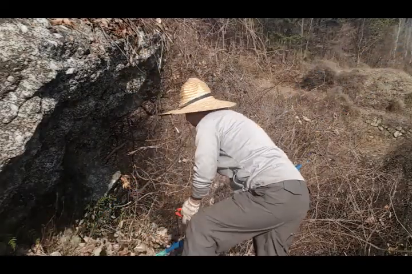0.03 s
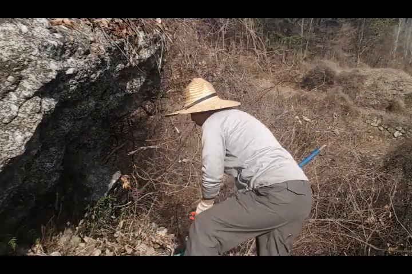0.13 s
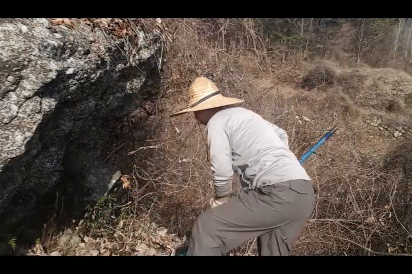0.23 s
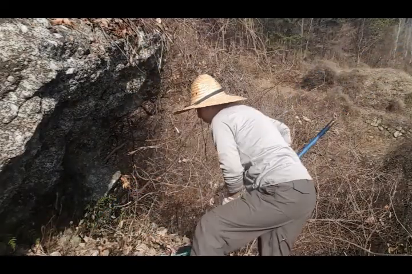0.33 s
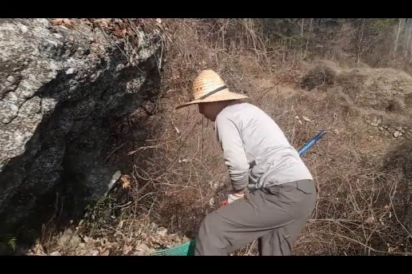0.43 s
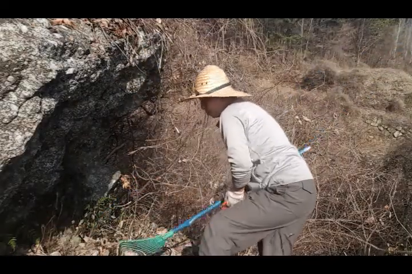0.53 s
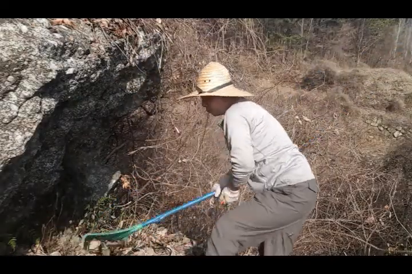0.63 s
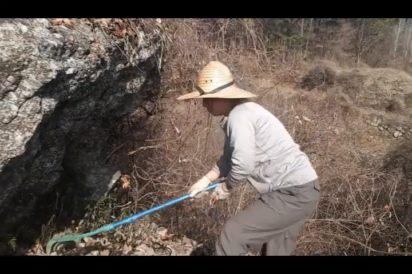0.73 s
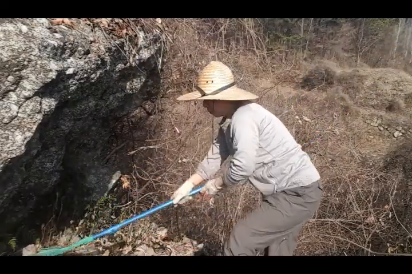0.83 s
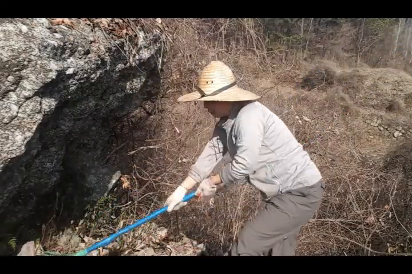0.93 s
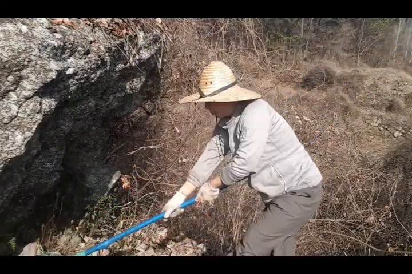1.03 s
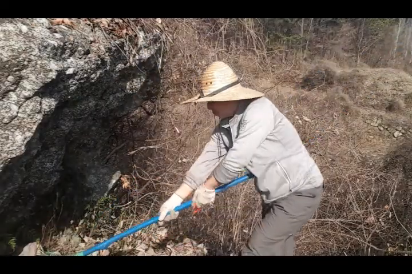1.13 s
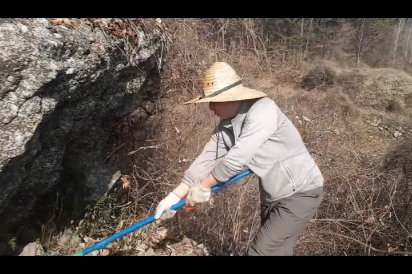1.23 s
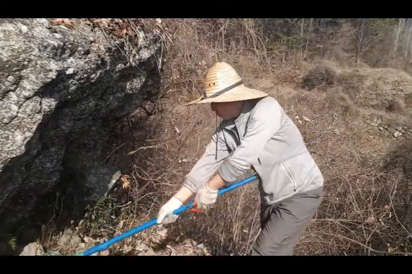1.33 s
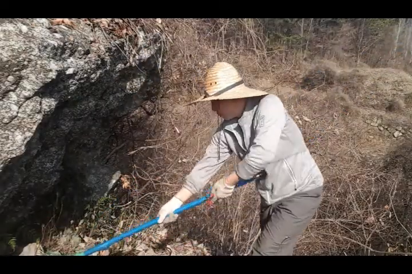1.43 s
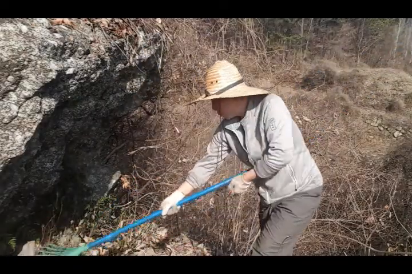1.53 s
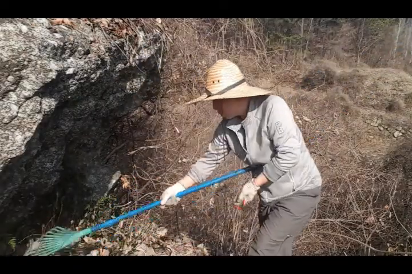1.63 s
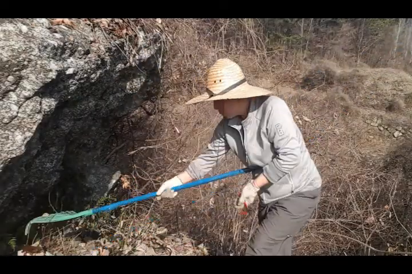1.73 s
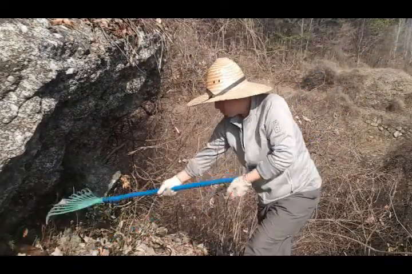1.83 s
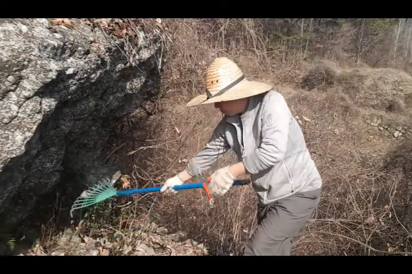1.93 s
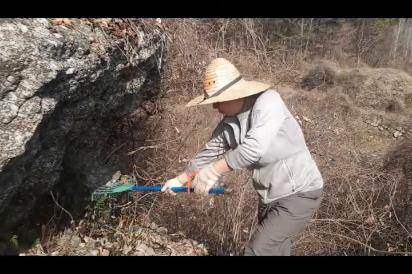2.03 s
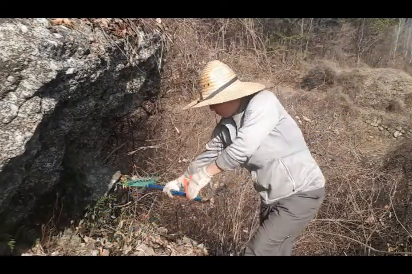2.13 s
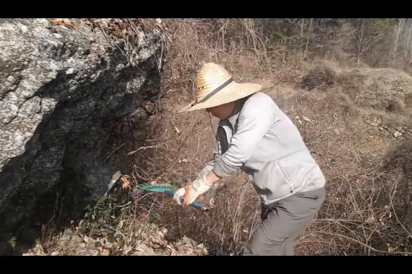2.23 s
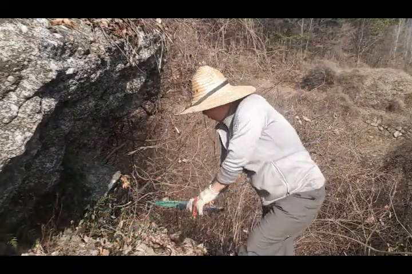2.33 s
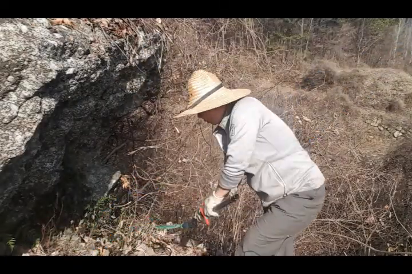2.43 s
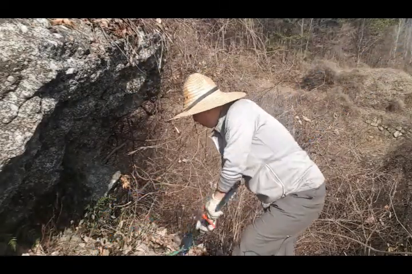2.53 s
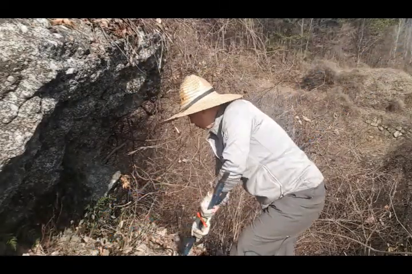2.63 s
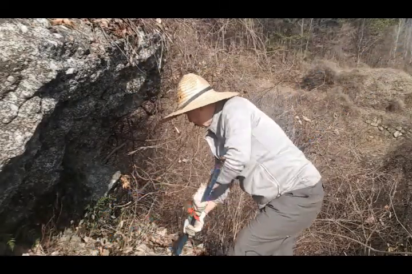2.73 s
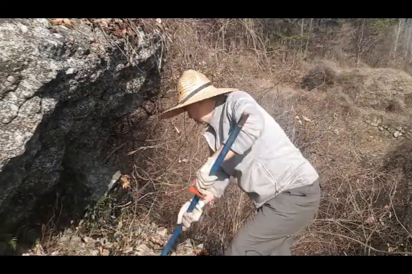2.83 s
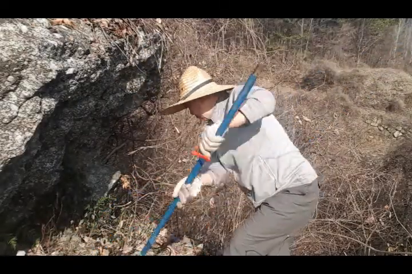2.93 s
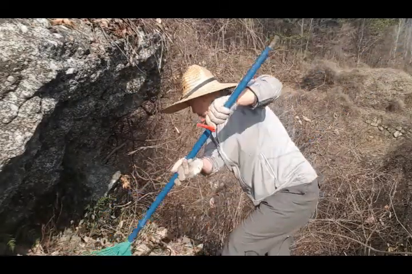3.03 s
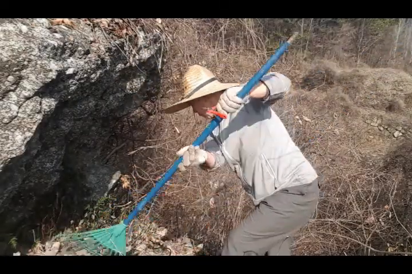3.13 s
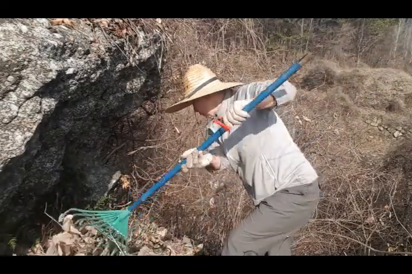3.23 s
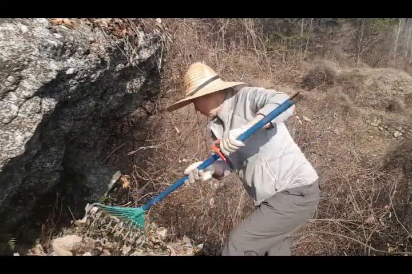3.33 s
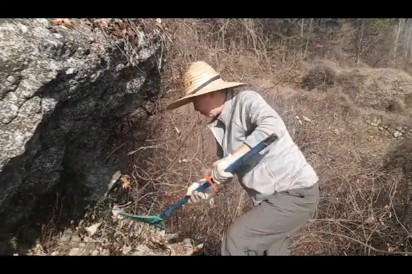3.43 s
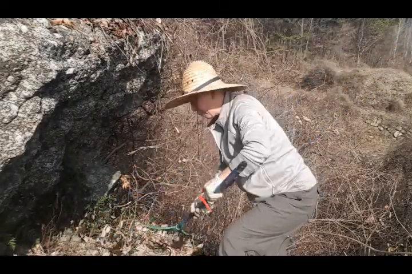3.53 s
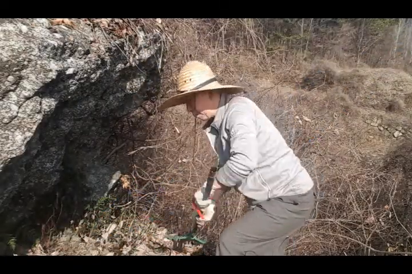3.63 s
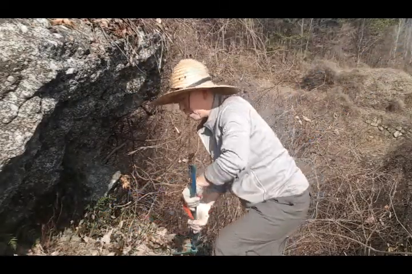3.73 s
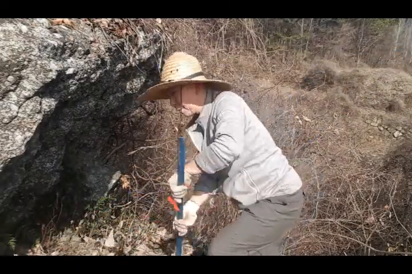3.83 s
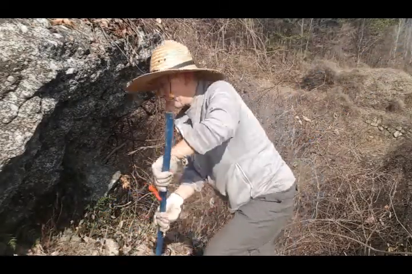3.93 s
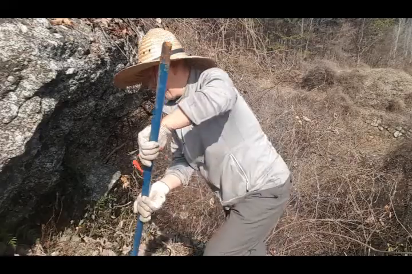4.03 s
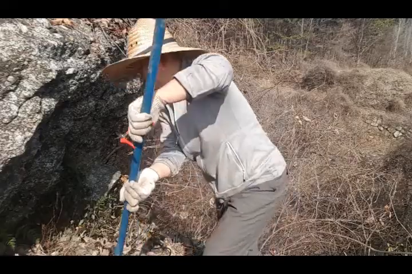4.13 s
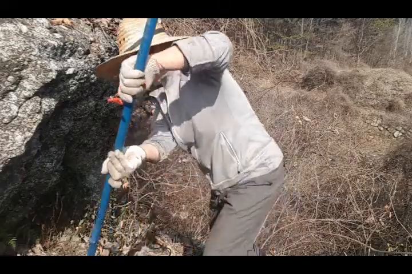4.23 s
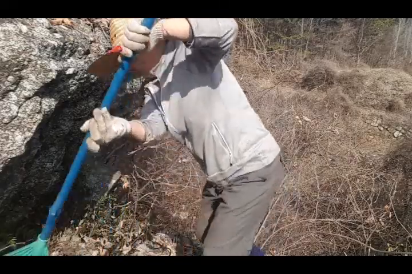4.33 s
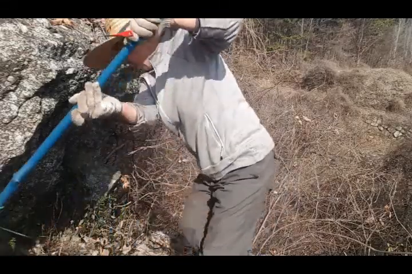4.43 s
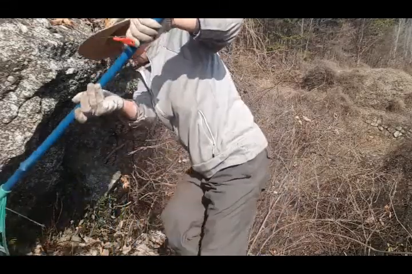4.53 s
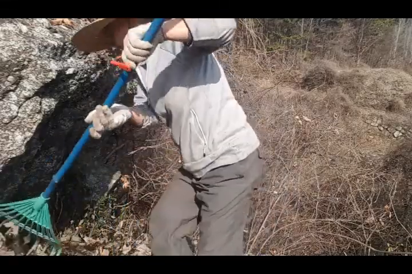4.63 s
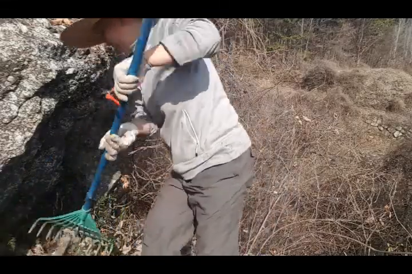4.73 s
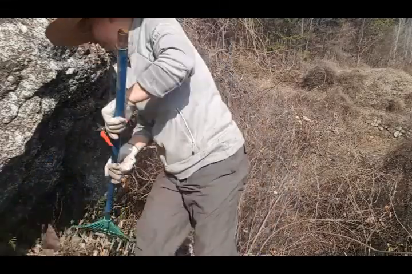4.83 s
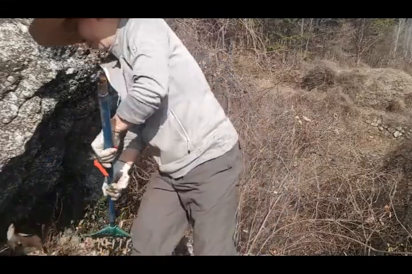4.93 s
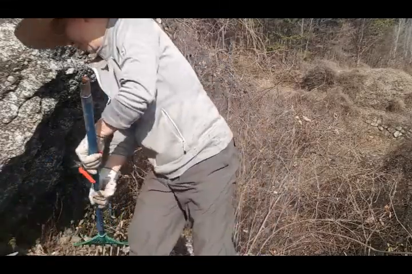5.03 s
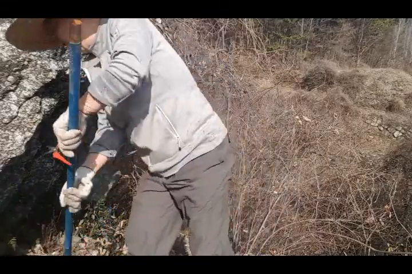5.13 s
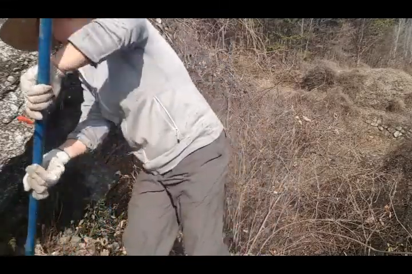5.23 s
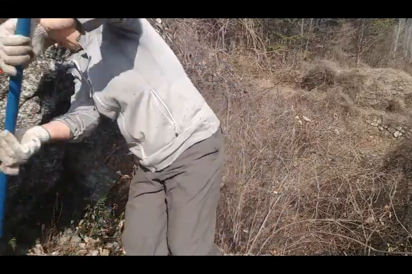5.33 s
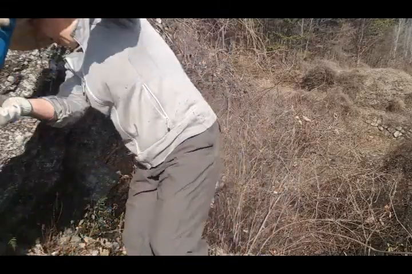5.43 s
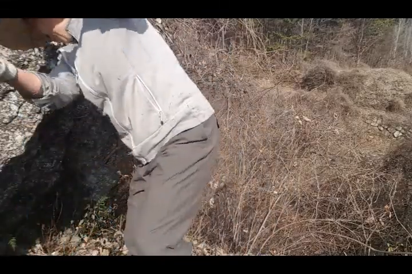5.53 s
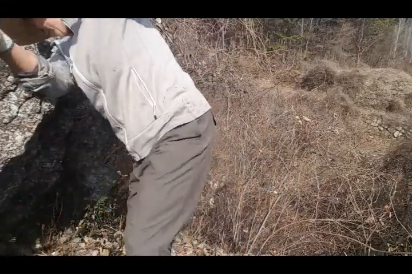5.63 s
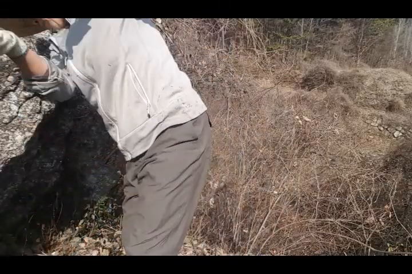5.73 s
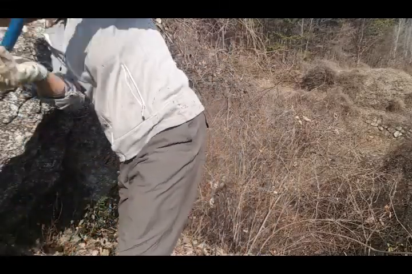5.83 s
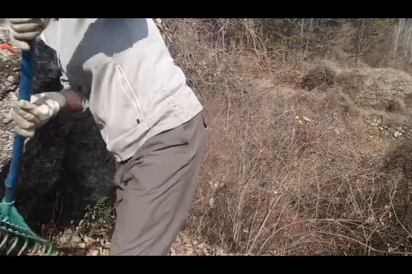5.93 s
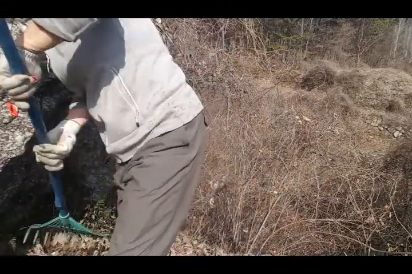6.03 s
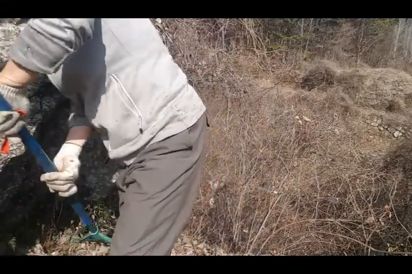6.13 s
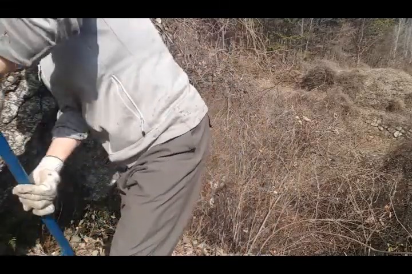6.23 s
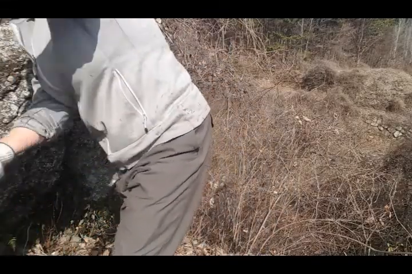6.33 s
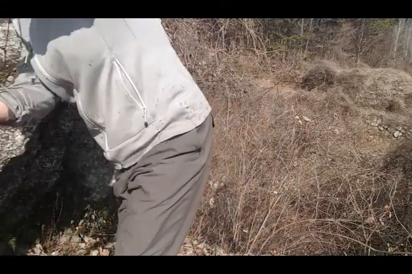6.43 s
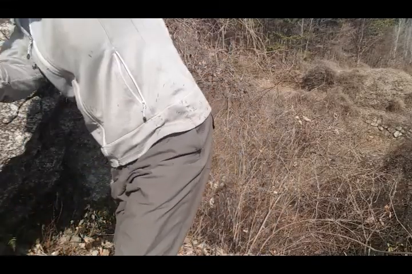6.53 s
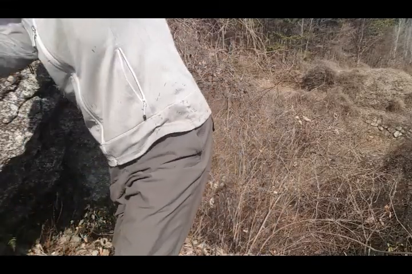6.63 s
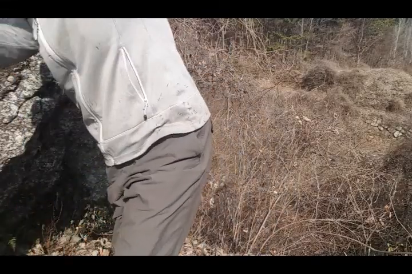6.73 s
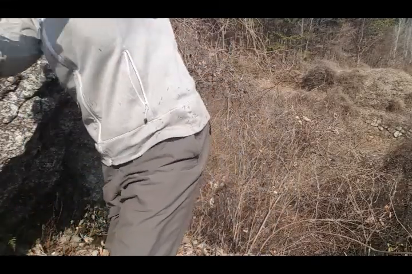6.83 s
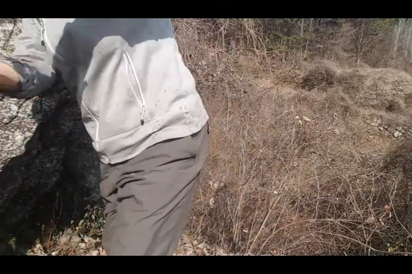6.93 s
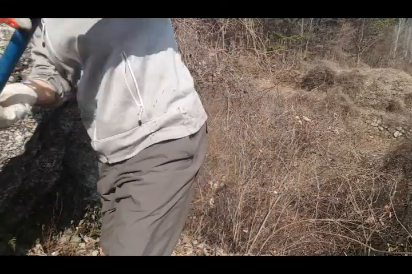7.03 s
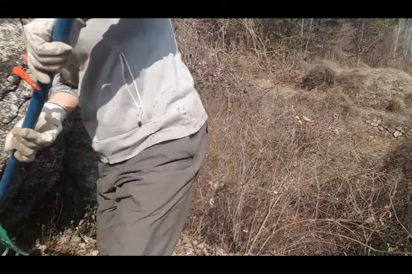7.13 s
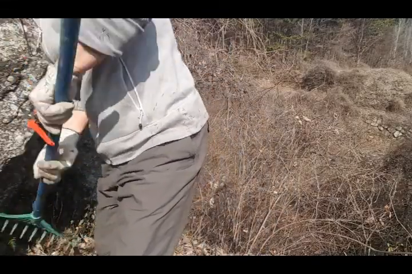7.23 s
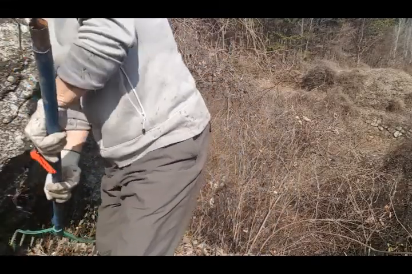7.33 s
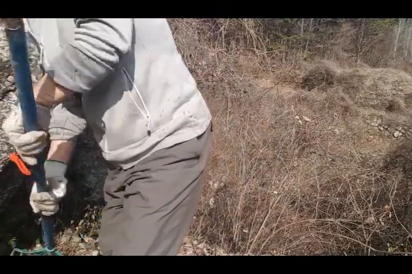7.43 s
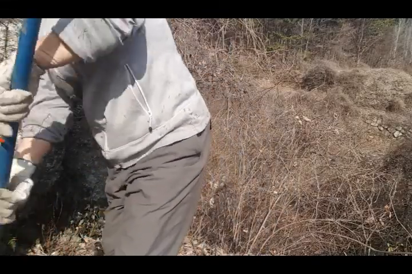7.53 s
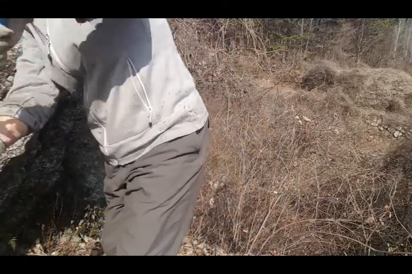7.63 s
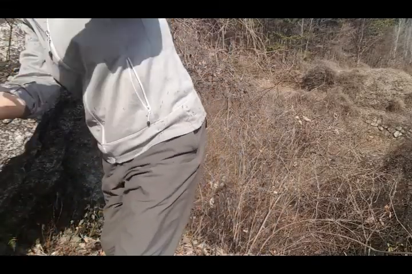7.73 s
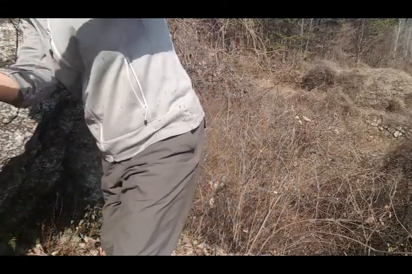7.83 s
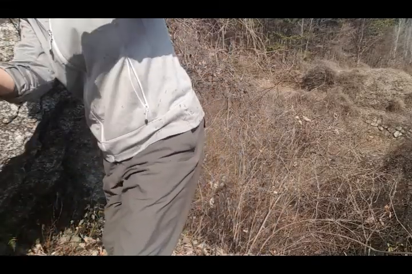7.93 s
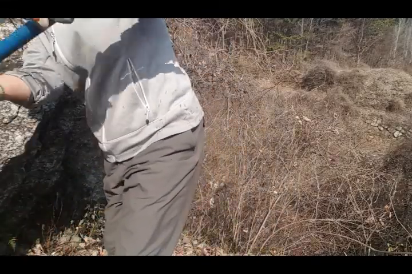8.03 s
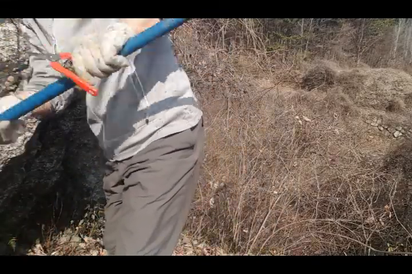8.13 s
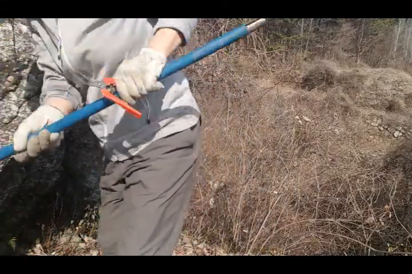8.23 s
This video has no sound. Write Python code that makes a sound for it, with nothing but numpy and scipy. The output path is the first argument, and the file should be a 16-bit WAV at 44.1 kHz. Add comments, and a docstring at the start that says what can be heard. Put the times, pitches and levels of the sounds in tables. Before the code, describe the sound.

A plastic rake scrapes through dry leaves and dead brambles on a quiet hillside. It starts with light, short scratches, then moves into longer, louder pulls that crackle and drag the heap over the soil. Twigs snap and the rake head knocks on the ground now and then. The work is close to the microphone and drifts to the right, over a faint open-air hush.

```python
"""A quiet slope, beside a rock: a plastic rake is pulled unevenly through dry leaves and dead brambles.
Leaves crumple in tiny bursts, stems rasp and ring the tines, and the heap drags over the soil.
Twigs snap and the rake head knocks. The work is close by and drifts to the right of a two-port
stereo microphone; ground and rock scatter the sound briefly, over a faint open-air hush."""
import sys
import numpy as np
from scipy import signal
from scipy.fft import rfft, irfft
from scipy.io import wavfile
from scipy.ndimage import uniform_filter1d

SR = 44100
rng = np.random.default_rng(int(sys.argv[2]) if len(sys.argv) > 2 else 0)


def persist_wave(psi):
    """Save psi, clipped to +-1, as 16-bit WAV."""
    counts = np.round(np.clip(psi, -1, 1) * 32767).astype(np.int16)
    wavfile.write(sys.argv[1], SR, np.atleast_2d(counts).T)


N = 365588

# Spectra of open air, twigs, dragged heap, stems and leaves. Each row: frequency in Hz, gain in dB.
AIR_SPECTRUM = [(20, -30), (50, -11), (170, -11), (700, -17.5), (2200, -21), (9400, -62), (14000, -57)]
TWIG_SPECTRUM = [(100, -8), (500, -21), (1300, 2), (2000, 3.5), (3500, 2), (6000, -5), (9600, -10.5),
                 (14000, -7)]
HEAP_SPECTRUM = [(25, -29), (50, -44), (75, -8), (140, 1.5), (300, 0.5), (480, 1), (650, 1.5), (820, 1),
                 (1050, -4.5), (1600, -3), (3500, -22.5)]
STEM_SPECTRUM = [(600, -22), (1100, -0.5), (1500, -3), (2000, -0.5), (2600, -3), (3300, -1), (4300, -5.5),
                 (7000, -17)]
LEAF_SPECTRUM = [(1500, -24), (3000, -14.5), (4300, -1), (6000, -1.5), (8200, -1), (9600, -5.5),
                 (11500, -1.5), (14500, -2)]
# Rake head and boots meeting the ground. Each row: start in seconds, peak in dB, pitch in Hz.
GROUND_KNOCKS = [(1.125, -41, 150), (1.267, -57, 500), (1.289, -49, 129), (1.915, -47, 587),
                 (2.695, -46, 400), (2.743, -38, 685), (2.898, -32.5, 490), (2.908, -36, 490),
                 (3.069, -39, 104), (4.101, -30.5, 517), (4.2, -28, 666), (4.872, -26.5, 480),
                 (4.876, -35, 200), (4.887, -32, 92), (5.33, -42, 303), (5.412, -37.5, 90),
                 (6.097, -32, 228), (6.483, -31.5, 345), (7.742, -28.5, 254)]
# Modes of the plastic head. Each row: frequency in Hz, relative level in dB, t60 in seconds.
PLASTIC_MODES = [(434, 5, 0.07), (636, 11, 0.07), (1080, -14, .04), (1600, 12, 0.043), (2000, -23, .04),
                 (2700, 13.5, 0.026)]
# Twigs breaking. Each row: start in seconds, level of the first 5 ms in dB, treble lift in dB,
# t60 of the splintering in seconds (negative for a clean break).
TWIG_SNAPS = [(0.984, -45, 9, 1), (1.058, -40.5, 6, -0.1), (1.102, -36, 12, -1), (1.325, -59.5, -3, 7),
              (1.493, -54, 17, -3.5), (1.638, -50, 7, 0.3), (1.921, -46, 3.5, 0.3), (2.028, -56.5, 3, 1),
              (2.101, -53.5, 14, 0.7), (2.374, -67, 8, -0.1), (2.561, -54, -6, 0.15),
              (2.692, -46.5, 8, -0.75), (2.747, -38, -1, -0.34), (2.872, -46.5, 2, -0.5),
              (2.912, -43, -14, -1.06), (4.233, -37, -9, 0.2), (4.2806, -25.5, 5.5, -0.33),
              (4.285, -32, 2, -0.3), (5.3411, -27.5, -0.5, -0.66), (5.349, -27.5, -8, -0.56),
              (5.832, -35, 5, -0.46), (6.152, -39, -7, -0.24), (6.263, -46, -8, 0.3),
              (6.441, -39.5, -1, -1.5), (6.464, -34.5, 12, -1), (6.561, -34, 18, 0.2),
              (6.7185, -26, 9, -0.4), (6.764, -43, 16, 1.8), (7.262, -39, 3, -1.9), (7.499, -49.5, 9, 1.2)]
# Resonances of the springy tines and hollow head. Each row: centre in Hz, width in Hz, gain in dB.
TINE_RESONANCES = [(842, 140, 5), (2630, 620, 7), (3100, 520, 0.5)]
# Pulls of the rake. Each row: start, swell and length in seconds, full force in dB, then offsets in dB
# for first bite, leaves, heap and tines, then the spill's length in seconds and its offset in dB.
RAKE_PULLS = [(-0.036, .147, 0.27, -40.5, -10, 3, -6, -12.5, 0.16, -6),
              (1.03, .07, 0.073, -46.5, -5, 3.5, -3.9, -14, .27, -17),
              (2.847, .19, 0.39, -41, -18, 3.8, 1, -8, 0.37, -12.5),
              (4.03, 0.28, .57, -40, -14.5, 2, 1, -8.5, 0.28, -6.4),
              (5.292, 0.32, 0.47, -34, -12.5, .1, -0.5, -11.5, .45, -13.5),
              (6.448, 0.27, 0.4, -37, -4.5, 3.8, 0.1, -5.5, 0.4, -6.5),
              (7.694, 0.065, 0.38, -38.5, -9, 2.2, -1, -4.5, 0.15, -10)]
# Short scrapes over the litter. Each row: start and length in seconds, force in dB, leaf offset in dB.
SHORT_SCRAPES = [(0.427, 0.015, -45, -13), (0.611, 0.22, -55.5, 1.5), (0.873, 0.13, -54.5, 3),
                 (1.237, 0.026, -53.5, -1), (1.676, .1, -57, 4), (1.787, .12, -55.5, 5.5),
                 (2.023, 0.12, -69, 5), (2.678, 0.017, -62, 8), (2.72, 0.019, -47, 2.5),
                 (2.79, 0.13, -58, -8), (3.633, 0.09, -52.5, -1.5), (4.036, .025, -50.5, -6),
                 (4.178, 0.038, -39, -1), (5.098, 0.024, -56, 8), (5.332, 0.018, -36.5, 0.5),
                 (7.584, 0.11, -61.5, 5), (7.738, 0.047, -37, 2)]
# The litter never lies quite still. In order: resting drive of leaves, stems, heap and tines in dB.
RESTING_STIR_DB = [-71.5, -69.5, -72, -78]
# The rake as seen from the microphone. Each row: time in seconds, angle to the right in degrees.
RAKE_BEARING = [(0, 9.2), (1.2, 29.3), (2.1, 25), (3.0, 16.4), (4.3, 15.7), (4.8, 41), (5.3, 29), (6.1, 54),
                (6.6, 44.5), (8.2, 50)]

AIR_DB, TOP_HZ = -65.5, 14600
PORT_LAG_MS = 0.46  # delay at the left port for a sound from the far right
CRACK_T60_S, FIBRES_PER_S = 0.015, 4500  # a twig's first break; fibres parting after it
CATCH_S, RELEASE_DB_PER_S = 0.033, 106  # the tines sink in; the rake comes to rest
SAG_DB_PER_S, HEAP_SAG_DB_PER_S = 3, 11.5  # the pull eases; the heap thins out faster still
SPILL_ATTACK_S, SETTLE_DB_PER_S = 0.12, 47  # leaves fall from the lifted rake and settle
SPILL_LEAF_DB, SPILL_HEAP_DB, SPILL_TINE_DB = 1.6, -4, -8.5
SCRAPE_ATTACK_S, SCRAPE_RELEASE_DB_PER_S, SCRAPE_HEAP_DB, SCRAPE_TINE_DB = 0.029, 221, -4, -9
STRAY_PER_S, STRAY_DB, STRAY_FOLLOW = 45, -31, 0.67  # lone ticks gain 0.67 dB per dB of leaf crackle


def undb(db):
    """Decibels to gain."""
    return 10 ** (np.asarray(db) / 20)


def unit(x):
    """Scale a stereo sound so that its centre has rms 1."""
    return x / np.sqrt(np.mean(x.mean(axis=0) ** 2))


def colour(x, points, size=4096):
    """Minimum-phase filter through the given (Hz, dB) points."""
    hz, db = np.transpose(points)
    bins_hz = np.maximum(np.fft.rfftfreq(size, 1 / SR), 1)
    cepstrum = irfft(np.log(undb(np.interp(np.log(bins_hz), np.log(hz), db))))
    cepstrum[1:size // 2] *= 2
    cepstrum[size // 2 + 1:] = 0
    impulse = irfft(np.exp(rfft(cepstrum)))
    return signal.fftconvolve(x, impulse[None], axes=1)[:, :x.shape[1]]


def resonate(x, modes):
    """A sum of resonances, each given as (Hz, width in Hz, dB)."""
    return sum(undb(db) * signal.lfilter(*signal.iirpeak(hz, hz / width, fs=SR), x)
               for hz, width, db in modes)


def walk(rate):
    """A smooth random wander of spread 1, with `rate` new values a second."""
    hold = max(int(SR / rate), 1)
    steps = np.repeat(rng.standard_normal(N // hold + 1), hold)
    wander = uniform_filter1d(uniform_filter1d(steps, hold), hold)[:N]
    return wander / wander.std()


def fade(t60, size):
    """Exponential decay, 60 dB down after t60 seconds."""
    return np.exp(-np.log(1000) * np.arange(size) / SR / max(t60, 1e-4))


def linger(power, t60):
    """Let each bit of energy die away exponentially."""
    keep = fade(t60, size=2)[1] ** 2
    return signal.lfilter([1 - keep], [1, -keep], power)


def gate(t, attack, length, release_db_per_s):
    """Gain that rises over the attack, holds to the given length and then dies away."""
    return np.clip(t / attack, 0, 1) * undb(-release_db_per_s * np.maximum(t - length, 0))


def add(out, sound, at):
    """Mix a short stereo sound in, starting at a sample."""
    part = out[:, at:at + sound.shape[1]]
    part += sound[:, :part.shape[1]]


def pan(db):
    """Gains that put the left port `db` above the right."""
    gains = undb(np.array([db, -db]) / 2).reshape(2, -1)
    return gains / np.sqrt(np.mean(gains ** 2, axis=0))


def ports(sound, lag_ms):
    """The sound reaches the microphone's right port first and the left one a little later."""
    index = np.arange(len(sound))
    late = np.rint(lag_ms * SR / 1000).astype(int)
    return np.array([sound[np.clip(index - late, 0, len(sound) - 1)], sound])


def crunch(power, lag_ms, echo_db, echo_t60):
    """Noise that follows an energy curve; ground and rock throw a different short spray at each port."""
    direct = ports(np.sqrt(power) * rng.standard_normal(len(power)), lag_ms)
    echoes = np.sqrt(linger(power + 1e-18, echo_t60)) * rng.standard_normal((2, len(power)))
    return direct + undb(echo_db) * echoes


def air():
    """Faint, gently swelling open-air hush, mostly shared by both ports."""
    noise = rng.standard_normal(N) + 0.78 * rng.standard_normal((2, N))
    swell_db = 1.8 * walk(rate=3.7)
    return unit(colour(noise, AIR_SPECTRUM)) * undb(AIR_DB + swell_db)


def knocks(size=8000):
    """A blow thumps the soil and rings the plastic head; loose earth shifts after it."""
    out, t = np.zeros((2, N)), np.arange(size) / SR
    head = sum(undb(db) * np.sin(2 * np.pi * hz * t) * fade(t60, size) for hz, db, t60 in PLASTIC_MODES)
    slide = fade(0.073, size) - fade(0.017, size)
    for start, db, hz in GROUND_KNOCKS:
        thump = np.sin(2 * np.pi * hz * t) * fade(9.2 / hz, size)
        earth = crunch(slide ** 2, lag_ms=0.13, echo_db=-12, echo_t60=0.065)
        earth = colour(earth, [(hz / 4, -18), (hz, 0), (hz * 2, -10), (hz * 8, -32)])
        blow = thump + undb(-20) * head + undb(-1.5) * earth / abs(earth).max()
        add(out, blow * undb(db) / abs(blow).max(), int(start * SR))
    return out


def snaps(lag_ms, side_db, size=9000):
    """A twig gives way over a few milliseconds; in some, a run of splintering fibres follows."""
    out = np.zeros((2, N))
    attack = int(0.005 * SR)
    for start, db, treble_db, splinter_t60 in TWIG_SNAPS:
        at = int(start * SR)
        fibres = linger(rng.random(size) < FIBRES_PER_S / SR, t60=0.00056)
        splinters = fibres / fibres.mean() * (0.6 * fade(splinter_t60, size)) ** 2
        first_break = 2.4 * fade(CRACK_T60_S, size) ** 2
        crack = crunch(first_break + splinters, lag_ms[at], echo_db=-3.5, echo_t60=0.05)
        crack = colour(colour(crack, TWIG_SPECTRUM), [(2500, 0), (7000, treble_db)])
        crack *= undb(db) / crack[:, :attack].mean(axis=0).std()
        add(out, crack * pan(1.16 * side_db[at]), at)
    return out


def fractures(rate, spread_db, t60, clump_db):
    """Energy of random tiny breaks, many weak and a few strong, each starting at once and dying fast."""
    breaks = rng.random(N) < rate / SR
    size_db = spread_db * np.minimum(rng.exponential(size=N), 4.5)
    catch_db = clump_db * walk(rate=45)  # the tines catch and let go
    power = linger(breaks * undb(size_db + catch_db) ** 2, t60)
    return power / power.mean()


def ticks(lag_ms, rate, spread_db, t60, low_hz, high_hz, size=900):
    """Flicked stalks and stiff leaf edges: each rings briefly at a pitch of its own."""
    count = int(rate * N / SR)
    when, pitch, force, length = rng.random((count, 4)).T[:, :, None]
    t = np.arange(size) / SR
    hz = low_hz * (high_hz / low_hz) ** pitch
    gain = undb(-spread_db * np.log(force + 0.027))
    decay = np.exp(-np.log(1000) * t / (t60 * (0.5 + length)))
    rings = gain * np.sin(2 * np.pi * hz * t) * decay
    samples = (when * (N - 1)).astype(int) + np.arange(size)
    return ports(np.bincount(samples.ravel(), rings.ravel(), N)[:N], lag_ms)


def stray_leaves(lag_ms):
    """Disturbed leaves give way one at a time, in lone ticks."""
    lone = fractures(rate=STRAY_PER_S, spread_db=4.5, t60=0.012, clump_db=3.5)
    return unit(colour(crunch(lone, lag_ms, echo_db=-22, echo_t60=0.03), LEAF_SPECTRUM))


def heap_drag(power, lag_ms):
    """The heap scrapes over the soil; the rake head lends it a hollow note."""
    scrape = crunch(power, lag_ms, echo_db=-5, echo_t60=0.12)
    hollow = resonate(scrape, [(623, 42, -6)])
    return unit(colour(scrape + hollow, HEAP_SPECTRUM))


def tine_ring(rubbing):
    """Rubbing rings the springy tines and the hollow of the head."""
    drive = colour(rubbing, [(300, -6.5), (700, 6.5), (3500, -4), (7000, -1.5)])
    return unit(resonate(drive, TINE_RESONANCES))


def stem_rasp(rubbing, stalks):
    """Dead stems rasp along the tines, with flicked stalks ticking among them."""
    return unit(unit(colour(rubbing, STEM_SPECTRUM)) + undb(-8) * unit(colour(stalks, STEM_SPECTRUM)))


def leaf_crackle(crumple, edges, lag_ms):
    """Dry leaves crumple in a bright spray while their stiff edges tick."""
    spray = crunch(crumple, lag_ms, echo_db=2.5, echo_t60=0.07)
    return unit(unit(colour(spray, LEAF_SPECTRUM)) + undb(-13.5) * unit(colour(edges, LEAF_SPECTRUM)))


def effort():
    """Gains of leaves, stems, heap and tines: pulls bite, swell, ease and spill; scrapes add to them."""
    clock = np.arange(N) / SR
    power = undb(RESTING_STIR_DB)[:, None] ** 2 * np.ones(N)
    for start, swell, length, db, bite_db, leaf_db, heap_db, tine_db, spill_s, spill_db in RAKE_PULLS:
        t = np.maximum(clock - start, 0)
        force_db = db + bite_db * np.maximum(1 - t / swell, 0) - SAG_DB_PER_S * np.maximum(t - swell, 0)
        force = undb(force_db) * gate(t, CATCH_S, length, RELEASE_DB_PER_S)
        pull = np.outer(undb([leaf_db, 0, heap_db, tine_db]), force)
        pull[2] *= undb(-HEAP_SAG_DB_PER_S * t)
        falling = undb(db + spill_db) * gate(t - length, SPILL_ATTACK_S, spill_s, SETTLE_DB_PER_S)
        spill = np.outer(undb([SPILL_LEAF_DB, 0, SPILL_HEAP_DB, SPILL_TINE_DB]), falling)
        power += pull ** 2 + spill ** 2
    for start, length, db, leaf_db in SHORT_SCRAPES:
        touch = undb(db) * gate(clock - start, SCRAPE_ATTACK_S, length, SCRAPE_RELEASE_DB_PER_S)
        power += np.outer(undb([leaf_db, 0, SCRAPE_HEAP_DB, SCRAPE_TINE_DB]), touch) ** 2
    return np.sqrt(power) * undb(0.66 * walk(rate=26))  # the litter lies unevenly


def raking(lag_ms, side_db):
    """The strokes drive leaves, stems, tines and heap; the microphone's body shades the treble most."""
    leaf_gain, stem_gain, heap_gain, tine_gain = effort()
    crumple = fractures(rate=2800, spread_db=2, t60=0.005, clump_db=0.46)
    rasp = fractures(rate=2200, spread_db=3.5, t60=0.0092, clump_db=2)
    drag = fractures(rate=1200, spread_db=1.5, t60=0.013, clump_db=1.07)
    wide_lag_ms = lag_ms + 0.045 * walk(rate=500)  # breaks spread over the width of the rake
    edges = ticks(lag_ms, rate=300, spread_db=1, t60=0.075, low_hz=3490, high_hz=14850)
    stalks = ticks(lag_ms, rate=170, spread_db=5, t60=0.095, low_hz=891, high_hz=4885)
    leaves = leaf_crackle(crumple, edges, wide_lag_ms) * leaf_gain
    # a crumpling leaf sounds in the stems' range as well
    rubbing = unit(crunch(rasp + 0.5 * crumple, wide_lag_ms, echo_db=2.5, echo_t60=0.05))
    middle = undb(-2.23) * (stem_rasp(rubbing, stalks) * stem_gain + tine_ring(rubbing) * tine_gain)
    heap = heap_drag(drag + 0.29 * rasp, lag_ms) * heap_gain
    strays = stray_leaves(wide_lag_ms) * undb(STRAY_DB) * leaf_gain ** STRAY_FOLLOW
    treble = leaves + strays
    return treble * pan(1.4 * side_db) + middle * pan(0.89 * side_db) + heap * pan(0.42 * side_db)


def scene():
    """Raking, snaps and knocks to the right of the microphone, over the quiet hillside."""
    times, degrees = np.transpose(RAKE_BEARING)
    rightward = np.sin(np.radians(np.interp(np.arange(N) / SR, times, degrees)))
    lag_ms = PORT_LAG_MS * rightward
    side_db = -1.3 - 6 * rightward  # port imbalance and shading of the left port; each layer scales it
    return raking(lag_ms, side_db) + snaps(lag_ms, side_db) + knocks() * pan(0.19 * side_db) + air()


def record(dry):
    """The recorder cuts the top steeply."""
    return signal.sosfilt(signal.ellip(10, 0.2, 70, TOP_HZ, fs=SR, output="sos"), dry)


dry = scene()
out = record(dry)
persist_wave(out)
```